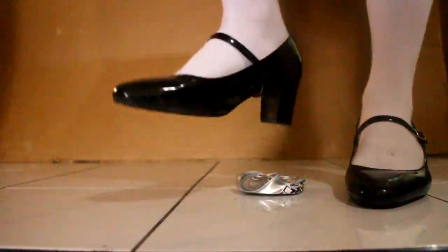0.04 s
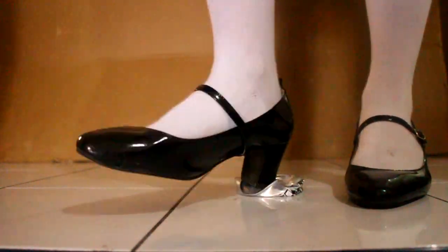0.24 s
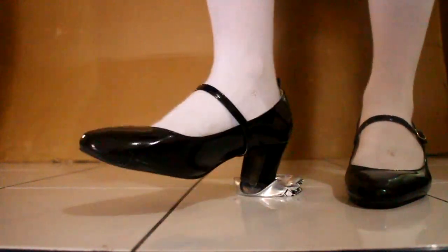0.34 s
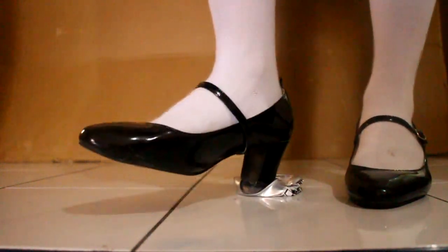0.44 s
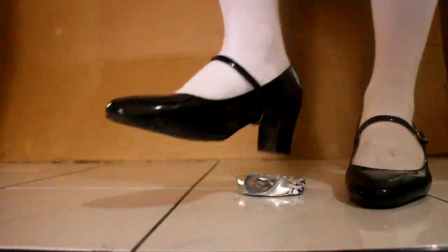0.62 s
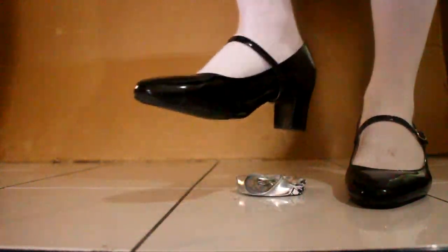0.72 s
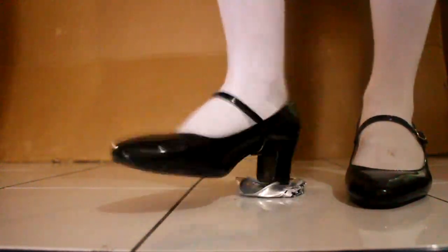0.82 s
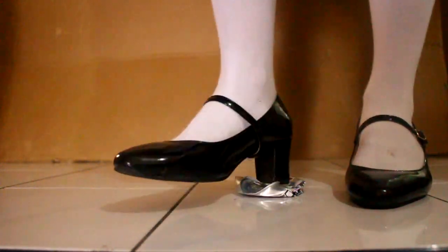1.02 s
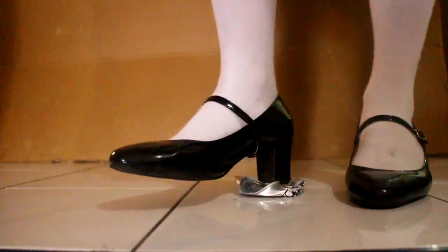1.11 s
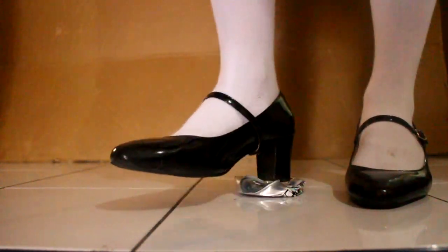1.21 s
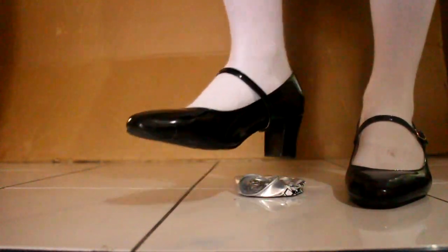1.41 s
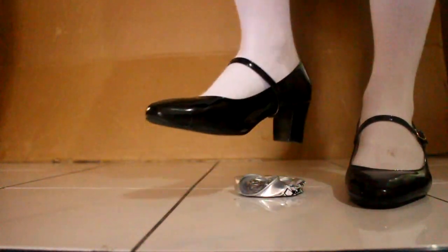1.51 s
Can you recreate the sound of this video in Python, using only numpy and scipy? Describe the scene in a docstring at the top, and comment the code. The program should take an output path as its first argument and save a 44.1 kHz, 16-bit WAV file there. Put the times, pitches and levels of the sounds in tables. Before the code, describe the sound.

A block heel stamps twice on a flattened metal can on tile in an echoing room

```python
"""A room hums softly, then a block heel stamps on a flattened metal can on a tiled floor, at about 0.2 s.
Near 0.6 s the heel lifts with a faint rub, and the metal springs back and rings freely.
A second stamp follows near 0.9 s; the metal springs back again and ticks until about 1.4 s.
Each buckle is a short crack through the can's damped shell, with a floor thud, answered by a hard, echoing room.
A gain control ducks on loud peaks, and what slips past it is clipped."""
import sys
import numpy as np
from scipy import signal
from scipy.fft import rfft, irfft, next_fast_len
from scipy.io import wavfile
from scipy.ndimage import uniform_filter1d, minimum_filter1d, map_coordinates

SR = 44100
rng = np.random.default_rng(int(sys.argv[2]) if len(sys.argv) > 2 else 0)


def output_pcm(signal):
    """Save a mono or channel-first signal as 16-bit PCM at the path in sys.argv[1].

    Samples are clipped to [-1, 1] before scaling.
    """
    pcm = np.clip(np.atleast_2d(signal).T, -1, 1) * 32767
    wavfile.write(sys.argv[1], SR, np.round(pcm).astype(np.int16))


N = 68355
T = np.arange(N) / SR  # time of each sample in seconds
SIZE = 2 * next_fast_len(N)  # padded length, so that filtering does not wrap around
HZ = np.fft.rfftfreq(SIZE, 1 / SR)


def amp(db):
    """Turn decibels into gain."""
    return 10 ** (np.asarray(db) / 20)


def unit(x):
    """Scale a sound to an rms of 1."""
    return x / np.sqrt(np.mean(x ** 2) + 1e-20)


def along(points, hz=HZ):
    """Join (Hz, value) points by straight lines on a logarithmic frequency axis."""
    point_hz, value = np.transpose(points)
    return np.interp(np.log(hz + 1), np.log(point_hz + 1), value)


def filtered(x, response):
    """Pass a sound through a frequency response."""
    return irfft(rfft(x, SIZE) * response, SIZE)[..., :N]


def causal(gain):
    """Give a gain curve the timing of a struck body, which never sounds before its cause."""
    cepstrum = irfft(np.log(np.maximum(gain, 1e-6)), SIZE)
    # Fold the backward half of time onto the forward half.
    cepstrum[1:SIZE // 2] *= 2
    cepstrum[SIZE // 2 + 1:] = 0
    return np.exp(rfft(cepstrum))


def delay(seconds):
    """Give the frequency response of a pure delay."""
    return np.exp(-2j * np.pi * HZ * seconds)


def resonance(hz, width_hz):
    """Give the gain of one damped resonance, which is 1 at its peak."""
    damping = HZ * width_hz
    return damping / np.hypot(hz ** 2 - HZ ** 2, damping)


# How alike the diffuse sound is on the left and right.
# Each row: frequency in Hz, likeness from 0 (unrelated) to 1 (the same).
LEFT_RIGHT_LIKENESS = [(100, 0.72), (1200, 0.83), (4000, 0.75), (8000, 0.64), (13000, .05)]


def stereo_noise():
    """Make diffuse sound as two close microphone ports hear it: much alike, less so in the treble."""
    turn = np.arccos(np.clip(along(LEFT_RIGHT_LIKENESS), -1, 1)) / 2
    mid_and_side = np.array([np.cos(turn), np.sin(turn)])
    mid, side = filtered(rng.standard_normal((2, N)), mid_and_side)
    return np.array([mid + side, mid - side])


# Colour of the room air.
# Each row: frequency in Hz, relative level in dB per Hz.
AIR_COLOUR = [(15, -40), (25, -14), (114, -2), (180, -2.5), (270, -6), (545, -9), (677, -6), (887, -8),
              (1890, -11.5), (2550, -18), (2910, -15), (11000, -30), (16000, -30)]


def room_air():
    """Shape diffuse noise into the steady, mostly low rush of the room."""
    air_db = -48.5  # rms
    return amp(air_db) * unit(filtered(stereo_noise(), amp(along(AIR_COLOUR))))


# Tones of the appliance hum.
# Each row: frequency in Hz, rms level in dB before the left-right balance.
HUM_TONES = [(60, -63.5), (121, -58), (667.5, -57.5)]


def appliance_hum(waver_hz=2):
    """Add steady tones whose pitches each wander slightly on their own."""
    hum = 0
    for hz, db in HUM_TONES:
        drift = map_coordinates(rng.standard_normal(40), [T * 10])  # smooth curve, ten random points a second
        phase = 2 * np.pi * np.cumsum(hz + waver_hz * drift) / SR
        hum = hum + amp(db) * unit(np.sin(phase))
    return hum


# How long the echo lasts.
# Each row: frequency in Hz, time to fall by 60 dB in seconds.
ECHO_FALL = [(100, 0.17), (400, 0.57), (1100, 0.49), (2500, 0.56), (5000, 0.5), (9000, 0.43), (15000, 0.34)]
# Colour of the echo tail.
# Each row: frequency in Hz, relative level in dB.
ECHO_COLOUR = [(100, 3.5), (1000, -2), (4000, -4.5), (9000, -1.5), (15000, -4)]
# First echoes from the walls.
# Each row: delay in seconds, level in dB relative to the direct sound.
FIRST_ECHOES = [(0.0131, -16.5), (.018, -12)]


def room():
    """Answer a sound with two first echoes and a diffuse tail that fades at its own pace in each band."""
    tail_db, build_s = -0.5, 0.002  # tail level before its colour, time constant of its rise
    hz, t, bands = signal.stft(stereo_noise(), SR, nperseg=256)
    fading = amp(-60 * t / along(ECHO_FALL, hz)[:, None])
    tail = signal.istft(bands * fading, SR, nperseg=256)[1][:, :N]
    tail = tail * (1 - np.exp(-T / build_s))
    diffuse = rfft(tail, SIZE) / np.linalg.norm(tail[0]) * amp(tail_db + along(ECHO_COLOUR))
    early = sum(amp(db) * delay(s) for s, db in FIRST_ECHOES)
    return diffuse + early


# Colour of the heel rubbing on metal.
# Each row: frequency in Hz, relative level in dB.
SCUFF_COLOUR = [(200, -19), (800, -3), (1400, 0), (2200, -8), (5000, -11), (9000, -22), (16000, -30.5)]


def scuff(grain_db=5):
    """Rub the heel on the metal as its weight comes off: grainy noise that swells and fades."""
    centre_s, length_s, scuff_db = 0.59, 0.047, -47  # level before the swell and the room
    roughness = unit(uniform_filter1d(rng.standard_normal(N), 90))  # varies over about 2 ms
    grains = amp(grain_db * roughness)
    rub = unit(filtered(grains * rng.standard_normal(N), amp(along(SCUFF_COLOUR))))
    swell = np.exp(-((T - centre_s) / length_s) ** 2)
    return filtered(amp(scuff_db) * rub * swell, 1 + room())


def crack(length_s, count=4):
    """Make a brief rush of tiny snaps, flattening its spectrum and shortening it in turn."""
    t = T[:SR // 10]
    gate = np.exp(-(t / max(length_s, .0004)) ** 4)
    snaps = rng.standard_normal(len(t))
    for _ in range(count):
        phase = np.angle(rfft(snaps * gate))
        snaps = irfft(np.exp(1j * phase), len(t))  # keep the timing, even out the spectrum
    snaps = snaps * np.sqrt(gate)
    return rfft(snaps / np.linalg.norm(snaps), SIZE)


# Tones of the can when the heel is off it.
# Each row: frequency in Hz, share of the energy in dB, time to fall by 60 dB in seconds.
CAN_TONES = [(2463, -12, 0.03), (4370, -10.5, 0.012), (5146, -15.5, 0.18), (6630, -9.5, 0.018),
             (7540, -9, 0.013), (8420, -8, 0.0069), (8830, -10, 0.035), (10570, -9, .008),
             (14500, -18, 0.0052)]


def ringing():
    """Ring the free can: each tone of the metal dies away at its own pace."""
    t = T[:SR // 2]
    ring = 0
    for hz, db, fall_s in CAN_TONES:
        fading = amp(db - 60 * t / fall_s)
        ring = ring + fading * np.sin(2 * np.pi * hz * t) / np.sqrt(fall_s * SR)  # long tones start softer
    return rfft(ring, SIZE)


# Basic colour of a crack.
# Each row: frequency in Hz, relative level in dB.
CRACK_COLOUR = [(40, -46), (120, -33.5), (250, -22), (500, -18.5), (720, -16.5), (950, -1.5), (1900, -7.5),
                (2700, -6.5), (4300, -5.5), (6000, -11.5), (7500, -13.5), (9800, -13.5), (12000, -22.5),
                (16000, -29.5)]
# The moments when the metal buckles or rocks.
# Each row: start in seconds, level in dB before the common force, crack length in seconds,
# clank lift in dB, treble lift in dB, thud level in dB, thud pitch in Hz, shell pitch in Hz,
# shell level in dB, upper shell pitch in Hz, upper shell level in dB, free ringing level in dB.
# The lifts and the levels after the first are relative to the buckle.
METAL_BUCKLES = [ (.2122, -11, 0.0034, 4, 5, -28, 410, 1070, -4, 1530, -19, -50),
                 (0.214, 2, 0.0047, -2.5, 0, -11.5, 440, 1142, 7.5, 1586, 4, -48),
                 (0.3077, -22, 0.0038, -19, -1, -19, 408, 1000, 17, 1660, 7, -45),
                 (0.5875, -27.5, 0.014, -1, 1, -30, 400, 2760, 10, 5180, 13, 1),
                 (0.5989, -17, 0.0041, -1.5, 1, -28, 381, 1320, 9, 1460, 10, 5.5),
                 (0.8943, -3.5, 0.0017, -1.5, 2.5, -6.5, 303, 1000, -11, 1370, -5, -48.5),
                 (0.8966, -2, 0.0028, 3, -1.5, -5.5, 266.4, 990, -7, 1380, 5.5, -45),
                 (0.9421, -12.5, 0.003, 0, 3, 0, 249, 1080, 16.5, 1260, 7.5, -55),
                 (.9441, -4, .002, 8.5, 0, -5, 500, 1126, 5.5, 1440, 5, -45),
                 (1.009, -20.5, 0.0052, -11, -17, -17, 293, 1080, 4, 2120, 6, -47),
                 (1.2603, -15, 0.0012, 3, -9, -13.5, 273, 1040, -0.5, 1513, 2.5, -36),
                 (1.2620, -24, 0.00092, 7, -8, -20, 280, 1170, 0.5, 2970, 5, -45),
                 (1.2764, -23, 0.011, -1.5, -3.5, -11, 283, 1430, -2, 2530, 7, -38),
                 (1.3262, -28.5, .004, 0.5, 2.5, -4, 270, 1120, -3, 1616, 5, -45),
                 (1.37, -27, 0.0087, -17, -9, -17, 282, 1250, 3, 1540, 1, -43)]


def can(force_db=29):
    """Let each buckle crack through the damped shell, thud on the floor and fill the room."""
    treble = along([(2800, 0), (9600, 1)])  # the treble lift fades in between these Hz
    clank = resonance(2040, 1020)
    thud_width_hz, shell_width_hz, upper_width_hz = 91, 198, 231
    total = 0
    for (start_s, db, length_s, clank_db, treble_db, thud_db, thud_hz,
         shell_hz, shell_db, upper_hz, upper_db, ring_db) in METAL_BUCKLES:
        snap = amp(along(CRACK_COLOUR) + clank_db * clank + treble_db * treble)
        thud = amp(thud_db) * resonance(thud_hz, thud_width_hz) ** 2
        shell = amp(shell_db) * resonance(shell_hz, shell_width_hz) ** 2
        upper_shell = amp(upper_db) * resonance(upper_hz, upper_width_hz) ** 2
        damped = causal(np.linalg.norm([snap, thud, shell, upper_shell], axis=0))  # energies add
        body = damped + amp(ring_db) * ringing()
        struck = amp(db + force_db) * crack(length_s) * body
        total = total + struck * delay(start_s) * (1 + room())
    return irfft(total, SIZE)[:, :N]


# Left-right balance.
# Each row: frequency in Hz, level of left over right in dB.
LEFT_OVER_RIGHT = [(100, 4), (400, 7), (1100, 4.5), (2200, 2), (6000, .4), (13000, 1.5)]
# Phase between the two microphone ports.
# Each row: frequency in Hz, lead of the left port in radians.
LEFT_PORT_LEAD = [(100, -0.65), (2000, 0.37), (5000, 0.31), (8000, -0.2), (10000, -0.73), (14000, -1.7)]


def scene():
    """Mix background, scuff and can, then lean the sound to the left in level and phase."""
    side = np.array([[.5], [-.5]])  # half the difference goes to each side
    ports = amp(along(LEFT_OVER_RIGHT) * side) * np.exp(1j * along(LEFT_PORT_LEAD) * side)
    background = room_air() + appliance_hum()
    return filtered(background + scuff() + can(), ports)


def record(dry):
    """Duck loud peaks and recover steadily, clip what slips past, then cut off the top treble."""
    limit_db, attack_s, hold_s, recover_db_per_s = -7.5, 0.0012, 0.028, 134
    look_ahead_s, top_hz = 0.00059, 16100
    pole = np.exp(-1 / (attack_s * SR))
    power = signal.lfilter([1 - pole], [1, -pole], np.mean(dry ** 2, axis=0))
    level_db = 10 * np.log10(power + 1e-12)
    over_db = np.maximum(level_db - limit_db, 0)
    # Hold the largest excess of the last moments.
    half_hold = int(hold_s * SR / 2) + 1
    held_db = -minimum_filter1d(-over_db, 2 * half_hold + 1, origin=half_hold)
    # Let the ducking fall no faster than the recovery.
    recovery_db = recover_db_per_s * T
    duck_db = np.maximum.accumulate(held_db + recovery_db) - recovery_db
    duck_db = np.interp(T + look_ahead_s, T, duck_db)  # ducking comes slightly early
    clipped = np.clip(dry * amp(-duck_db), -1, 1)
    return filtered(clipped, 1 / (1 + (HZ / top_hz) ** 120))


dry = scene()
out = record(dry)
output_pcm(out)
```